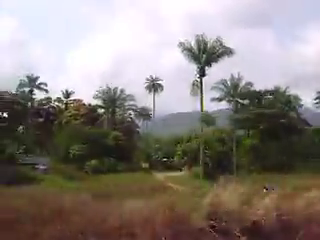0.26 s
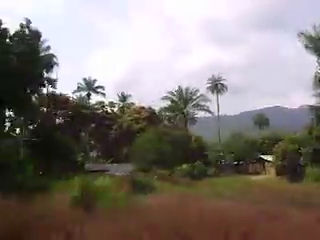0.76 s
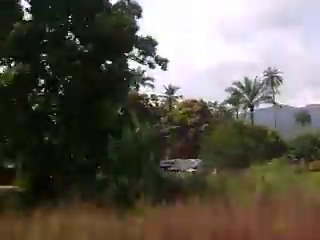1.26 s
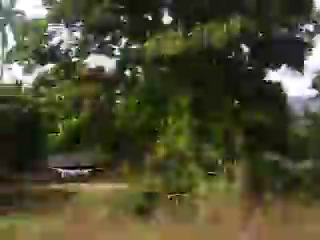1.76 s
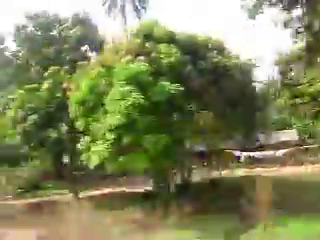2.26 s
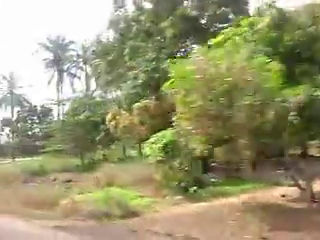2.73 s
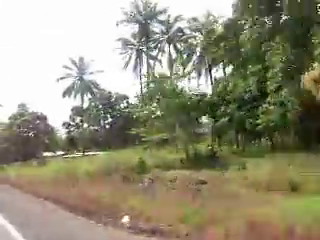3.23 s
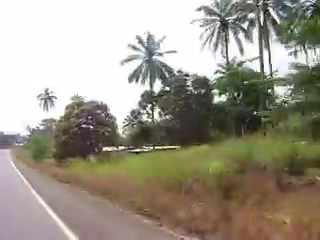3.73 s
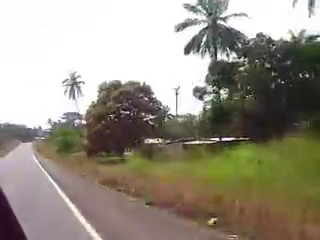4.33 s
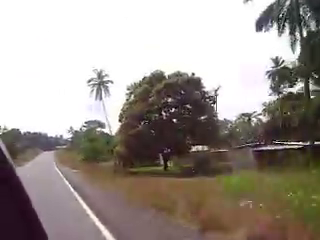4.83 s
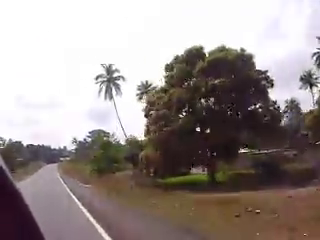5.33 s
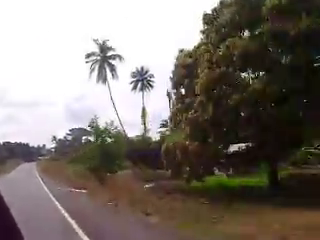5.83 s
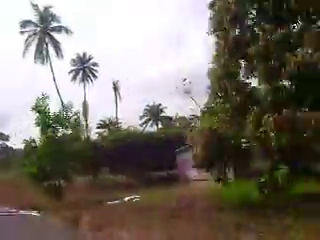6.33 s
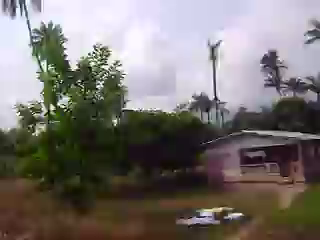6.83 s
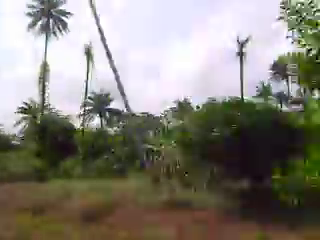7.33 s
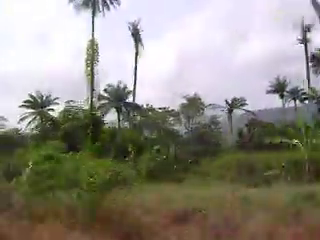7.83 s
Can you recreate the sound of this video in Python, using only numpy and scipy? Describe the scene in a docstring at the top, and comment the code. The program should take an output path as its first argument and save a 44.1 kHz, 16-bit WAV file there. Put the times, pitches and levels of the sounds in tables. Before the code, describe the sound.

Inside a car on a country road, tyres roar steadily with a faint drivetrain whine and a low boom of air at an open window. After about two seconds, wind hits the microphone at the opening and swells into a loud, distorted rumble with rasping hiss. It then eases, breaks into separate puffs and dies away, while the tyre noise also fades.

```python
"""Inside a car on a country road, with a side window open and a microphone at the opening.
Tyres roar, the drivetrain whines faintly and the cabin air booms against the open window.
After two seconds the slipstream (the air rushing past the car) hits the microphone and overloads it.
Its eddies, small swirls of air, merge into a rush, then break up into single puffs and die away."""
import sys
import numpy as np
from scipy import signal
from scipy.fft import rfft, irfft, next_fast_len
from scipy.io import wavfile
from scipy.ndimage import uniform_filter1d, map_coordinates

SR = 44100
rng = np.random.default_rng(int(sys.argv[2]) if len(sys.argv) > 2 else 0)


def transcribe(u):
    """Save the signal u as a 16-bit wav file named by the first command-line argument.

    u: samples, shape (n,) or (channels, n), limited to [-1, 1]; the rate is SR.
    q: integer samples, one column per channel.
    """
    v = np.clip(np.atleast_2d(u).T, -1, 1)
    q = np.round(v * 32767).astype(np.int16)
    wavfile.write(sys.argv[1], SR, q)


N = 356328


def undb(db):
    """Turn decibels into a number to multiply by."""
    return 10 ** (np.asarray(db) / 20)


def unit(x):
    """Scale to an average power of 1."""
    return x / np.sqrt(np.mean(x ** 2))


def curves(table):
    """Join a table's rows with straight lines: one curve for each column after the time."""
    time_s, *columns = np.transpose(table)
    return [np.interp(np.arange(N) / SR, time_s, column) for column in columns]


def colour(x, tone):
    """Make some pitches stronger and others weaker; white noise keeps its power."""
    hz, db = np.transpose(tone)
    size = 2 * next_fast_len(N // 2 + SR // 8)
    bin_hz = np.arange(size // 2 + 1) * SR / size
    gain = unit(undb(np.interp(np.log(bin_hz + 1), np.log(hz), db)))
    # make the filter ring only after a sound, never before it
    cepstrum = irfft(np.log(gain))
    cepstrum[1:size // 2] *= 2
    cepstrum[size // 2 + 1:] = 0
    return irfft(rfft(x, size) * np.exp(rfft(cepstrum)))[:N]


def noise():
    """White noise: all pitches equally strong."""
    return rng.standard_normal(N)


def wander(turns_per_s):
    """A curve that drifts up and down by chance, typically by about 1."""
    return unit(np.interp(np.arange(N) * turns_per_s / SR, np.arange(N), noise()))


def flutter(db):
    """A wavering volume that keeps the average power."""
    return unit(undb(db))


def even(x, span_s):
    """Flatten the slow swells of a sound and leave the quick ones."""
    return x / np.sqrt(uniform_filter1d(x ** 2, max(int(span_s * SR), 2)) + 1e-9)


def moving_air(tone, speed):
    """A pattern of eddies is carried past: the faster it goes, the higher it sounds."""
    place = np.cumsum(speed)
    return map_coordinates(colour(noise(), tone), [place], order=3, mode="mirror")


# How loud the tyres are: time_s, level_db
TYRE_LEVELS = [(0, -24), (.6, -24.5), (1.0, -27.5), (1.5, -25), (2.0, -24.5), (3.0, -26.5), (4.5, -29),
               (6.0, -33), (6.9, -44.5), (7.5, -42.5), (8.08, -43)]
# The tone of their roar: pitch_hz, relative_db
TYRE_TONE = [(60, -11.5), (180, -3), (360, 1), (550, -1), (800, 0.5), (1100, -0.5), (1550, -5), (1780, -4),
             (2250, -10), (2750, -11.5), (3300, -19), (4900, -26.5), (5500, -39), (6500, -56)]
# The drivetrain's notes: pitch_hz, level_db (compared with the roar)
WHINE_NOTES = [(366.3, -15), (678.5, -15), (935.5, -12)]


def tyres_and_drivetrain():
    """Tyres roar on coarse asphalt; the drivetrain whines through it at a nearly steady speed."""
    level_db, = curves(TYRE_LEVELS)
    roar = colour(noise() * flutter(wander(25)), TYRE_TONE)
    speed = 1 + .0015 * wander(2.5)
    whine = 0
    for pitch_hz, note_db in WHINE_NOTES:
        phase = 2 * np.pi * np.cumsum(pitch_hz * speed + 3 * wander(40)) / SR
        note = unit(np.sin(phase) * undb(2 * wander(7)))
        whine += note * undb(note_db)
    return (roar + whine) * undb(level_db)


# How the window's boom swells and fades: time_s, relative_db
BOOM_LEVELS = [(0, -15.5), (.25, -26.5), (.45, -19), (.8, -26), (1.25, -28), (1.45, -18), (1.6, -24),
               (1.75, -19), (1.95, -22), (2.12, -12), (2.6, -9.5), (3.55, -10), (3.8, -15.5), (4.07, -8.5),
               (4.25, -14.5), (4.53, -9), (4.7, -15.5), (5.3, -14.5), (5.8, -19), (6.1, -16), (6.8, -14.5),
               (7.4, -18), (7.88, -25), (8.08, -22.5)]
# Its tone at speed 1: pitch_hz, relative_db
BOOM_TONE = [(15, -27.5), (28, -12), (45, -3.5), (65, -1.5), (90, 0), (120, -6.5), (180, -15.5), (400, -58)]


def window_boom(depth):
    """Cabin air heaves against the open window, sounding higher deeper in the slipstream."""
    level_db, = curves(BOOM_LEVELS)
    heave_db = .5 + 2.5 * wander(turns_per_s=8)
    speed = np.interp(depth, [0, 1], [.7467, 1.346])
    return even(moving_air(BOOM_TONE, speed), span_s=.085) * undb(level_db + heave_db)


def eddy_bursts(eddies_per_s, rise_s=.0026, decay_s=.003):
    """A volume curve for eddies that arrive unevenly, each swelling and fading in milliseconds."""
    count = np.floor(np.cumsum(eddies_per_s * flutter(5 * wander(90))) / SR)
    arrives = np.diff(count, prepend=0) > 0
    size = undb(np.clip(noise(), -1.5, 1.5))
    power = signal.lfilter([1], [1, -np.exp(-2 / (decay_s * SR))], arrives * size ** 2)
    # an eddy is felt a moment before its centre arrives
    lead = np.exp(-2 / (rise_s * SR))
    power = signal.lfilter([1 - lead], [1, -lead], power[::-1])[::-1]
    power += .02  # a trickle of air between eddies
    clusters = flutter(2 * wander(90))
    return even(np.sqrt(power) * clusters, span_s=.031)


# How the wind's low rumble and high hiss rise and fall: time_s, rumble_db, hiss_db
WIND_LEVELS = [(0, -27.5, -44), (.2, -25.5, -40), (.45, -34.5, -47), (.62, -30, -44), (.8, -36, -52),
               (1.25, -36.5, -51), (1.45, -35, -45), (2.0, -36, -46), (2.1, -22, -41), (2.32, -15.5, -29),
               (2.54, -12.5, -24.5), (2.72, -11.5, -30), (3.4, -10, -27.5), (3.55, -12.5, -32.5),
               (4.05, -12.5, -31.5), (4.2, -18.5, -37), (4.38, -12.5, -29), (4.6, -17, -35.5),
               (5.7, -17.5, -36), (6.15, -24, -45), (6.57, -23.5, -46), (6.8, -21.5, -41),
               (6.93, -36.5, -57), (7.15, -24.5, -53), (7.5, -37.5, -64), (8.08, -38, -66.5)]
# The tone of eddies shoving the microphone, at speed 1: pitch_hz, relative_db
RUMBLE_TONE = [(40, -24), (75, -4), (110, -1), (160, -0.5), (250, -4.5), (450, -9), (800, -16), (1200, -24),
               (1900, -28), (3000, -43), (5500, -63)]
# The rasp of eddies tearing at the rim of the microphone's hole: pitch_hz, relative_db
RASP_TONE = [(150, -14.5), (450, 0.5), (900, -0.5), (1300, -6), (1800, -5.5), (2400, -15.5), (3500, -19.5),
             (6000, -39)]
# The hiss of the finest eddies: pitch_hz, relative_db
HISS_TONE = [(400, -14), (1500, -0.5), (2400, 0.5), (3500, 2.5), (5000, -2.5), (6500, -3)]


def slipstream(depth):
    """Eddies cross the microphone; each brings a low shove, a rasp and a sputtering hiss at once."""
    rumble_db, hiss_db = curves(WIND_LEVELS)
    gust_db = 1.3 * wander(turns_per_s=8)
    speed = undb(.2 * (hiss_db + 34))  # louder hiss means faster air
    # deeper in the stream the eddies crowd into a rush and rasp less
    crowding = depth ** 2
    eddies_per_s = speed ** 2 * 140 * (520 / 140) ** crowding
    rasp_db = 15.5 - 15 * crowding + 7 * (speed - 1)
    eddies = eddy_bursts(eddies_per_s)
    grain = flutter(2.3 * wander(900))
    swirls = moving_air(RUMBLE_TONE, speed)
    # the big slow swirls roll on; only the smaller ones break into bursts
    big_swirls = signal.sosfiltfilt(signal.butter(2, 250, fs=SR, output="sos"), swirls)
    rumble = even(big_swirls + (swirls - big_swirls) * eddies ** .85, span_s=.053)
    rasp = colour(noise() * eddies, RASP_TONE) * undb(rasp_db)
    hiss = colour(noise() * eddies * grain, HISS_TONE) * undb(8)
    return (rumble * undb(rumble_db + 3) + (rasp + hiss) * undb(hiss_db - 1)) * undb(gust_db)


# Lone eddies hitting the microphone: start_s, strength_db, snap_db (added to the strength for the snap)
PUFF_HITS = [(0.183, -9, -8), (0.217, -11, -19), (0.276, -10, -32), (0.563, -6.5, -24), (0.833, -10, -19),
             (1.166, -14.5, -14), (1.355, -11, -15), (1.512, -13, -14), (2.101, -8, -27),
             (2.172, -5.5, -24), (2.207, -2.5, -14.5), (2.368, 2.5, -11), (2.454, 9.5, -13), (2.97, 4, -24),
             (3.193, 2.5, -21), (5.885, -22, -22), (5.962, -11.5, -21), (6.027, -16, -31),
             (6.063, -9.5, -22), (6.131, -21, -29), (6.161, -16, -24), (6.228, -15, -10), (6.405, -10, -15),
             (6.434, -11.5, -14), (6.532, -18.5, -19), (6.774, -21, -14), (6.816, -30, -12),
             (6.845, -18.5, -9), (6.871, -14.5, -20), (7.050, -16, -20), (7.058, -17, -15),
             (7.19, -20, -15)]


def puffs(slap_decay_s=.0058, wake_decay_s=.037, wake_db=-26.5):
    """A lone eddy gives a rough slap with a bright snap; both fade fast into a faint wake of air."""
    slap, snap = np.zeros((2, N))
    age_s = np.arange(SR // 8) / SR
    fade = np.exp(-age_s / slap_decay_s) + undb(wake_db) * np.exp(-age_s / wake_decay_s)
    for start_s, strength_db, snap_db in PUFF_HITS:
        span = slice(int(start_s * SR), int(start_s * SR) + len(age_s))
        slap[span] += fade * undb(strength_db)
        snap[span] += fade * undb(strength_db + snap_db)
    # pitch_hz, relative_db
    slap_tone = [(60, -11), (200, 9.5), (600, 3.5), (1100, -7), (2200, -14), (5500, -36)]
    body = even(colour(noise(), slap_tone), span_s=.0024)
    return body * slap * undb(-4) + colour(noise(), HISS_TONE) * snap


# How far the microphone is into the slipstream: time_s, depth (0 at the edge, 1 deep inside)
STREAM_DEPTH = [(0, 0.011), (1.4, .03), (2.05, .38), (2.5, .45), (3.2, 0.76), (4.2, 0.99), (5.5, 0.91),
                (6.2, .6), (7.0, .45), (8.08, 0)]


def scene():
    """Wind, window and road sounds add up at one microphone."""
    depth, = curves(STREAM_DEPTH)
    mix = slipstream(depth) + puffs() + window_boom(depth) + tyres_and_drivetrain()
    return mix[None]


def record(dry):
    """The microphone overloads and loses the top treble; the hardest hits leave a thin crackle."""
    overloaded = np.clip(dry, -.705, .705)
    dulled = signal.sosfiltfilt(signal.butter(14, 5484, fs=SR, output="sos"), overloaded)
    # the flattened peaks overshoot in the filter and are cut once more
    crackly = np.clip(dulled, -.708, .708)
    return signal.sosfilt(signal.ellip(8, .2, 70, 15900, fs=SR, output="sos"), crackly)


dry = scene()
out = record(dry)
transcribe(out)
```